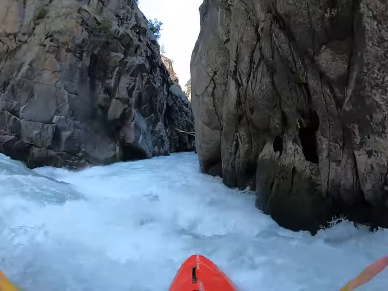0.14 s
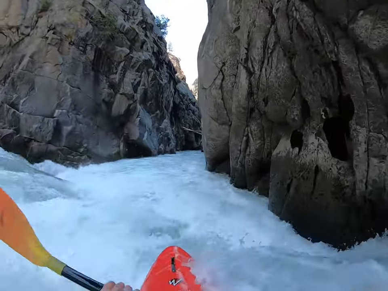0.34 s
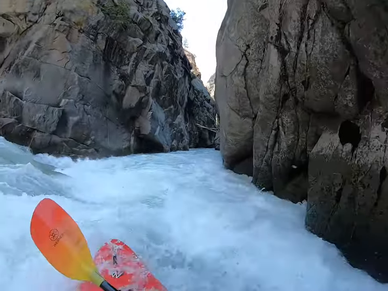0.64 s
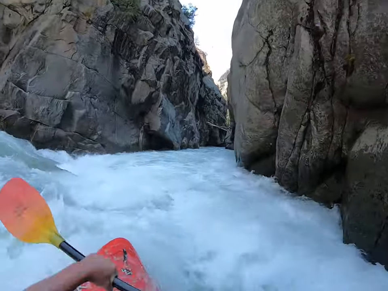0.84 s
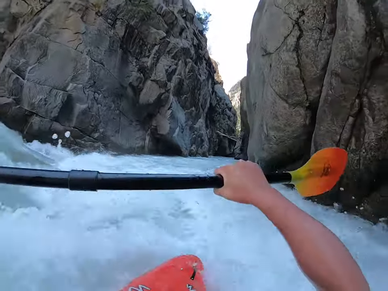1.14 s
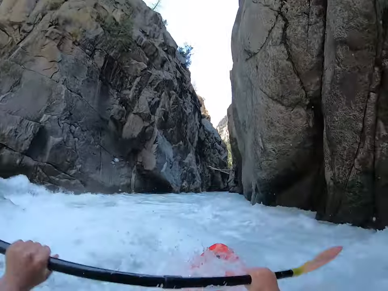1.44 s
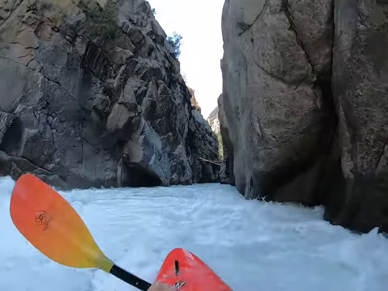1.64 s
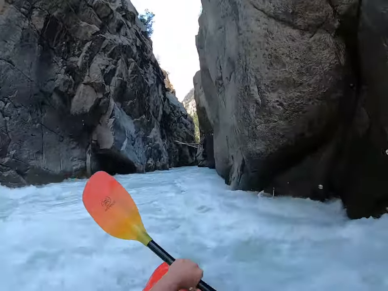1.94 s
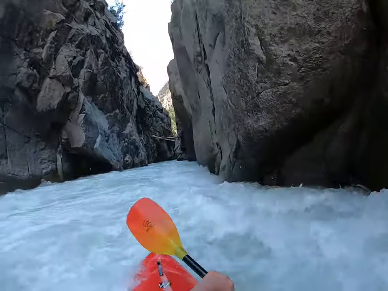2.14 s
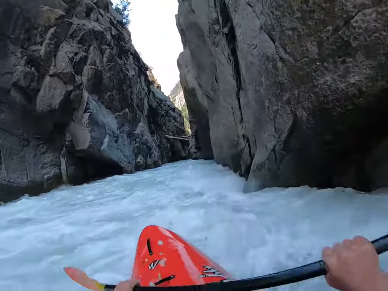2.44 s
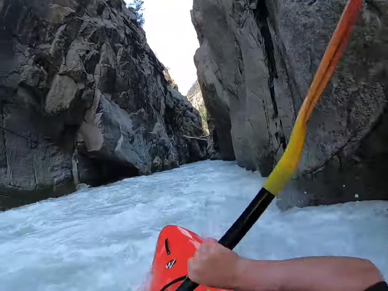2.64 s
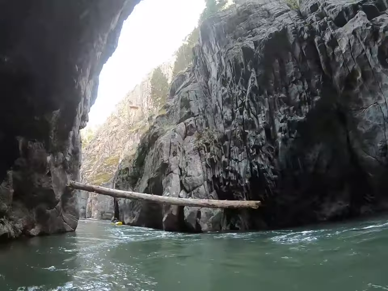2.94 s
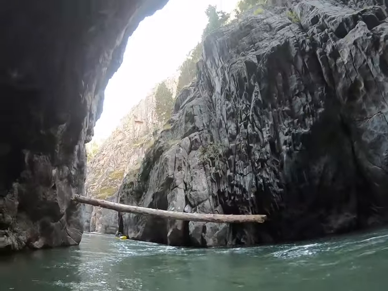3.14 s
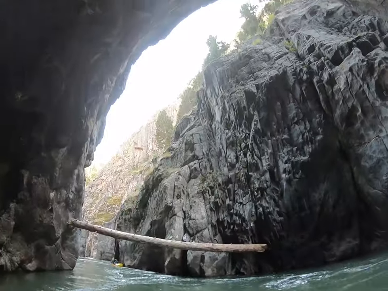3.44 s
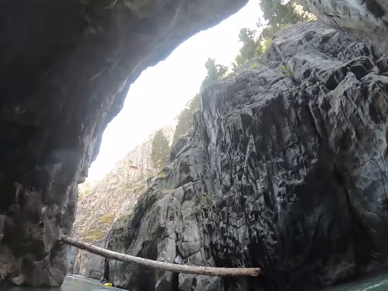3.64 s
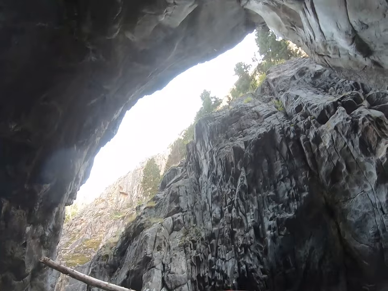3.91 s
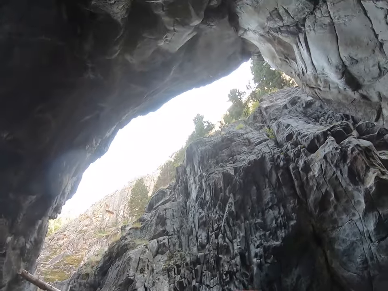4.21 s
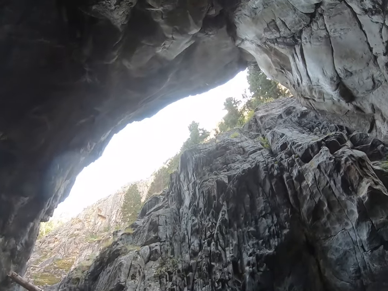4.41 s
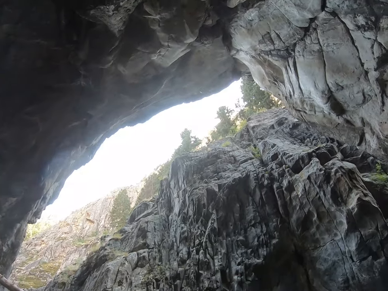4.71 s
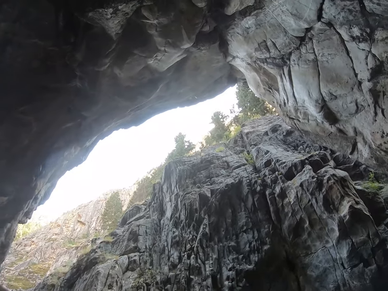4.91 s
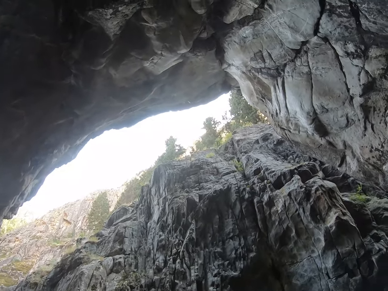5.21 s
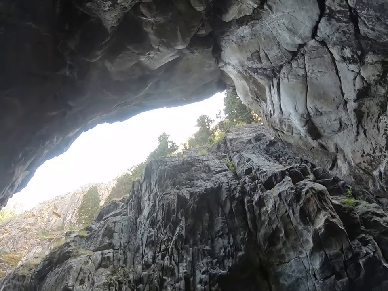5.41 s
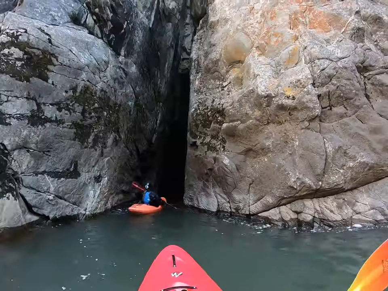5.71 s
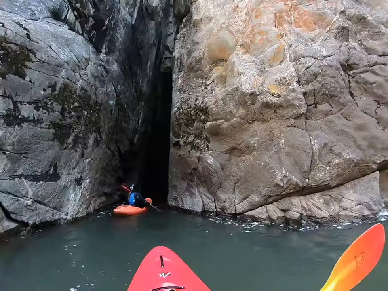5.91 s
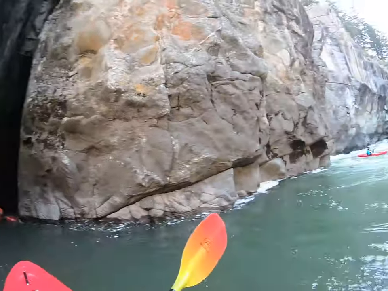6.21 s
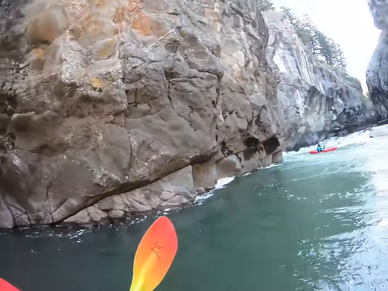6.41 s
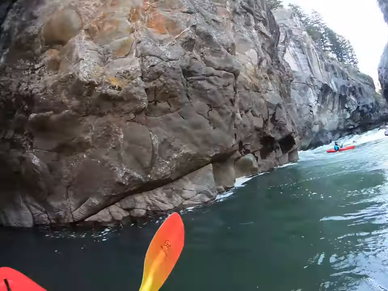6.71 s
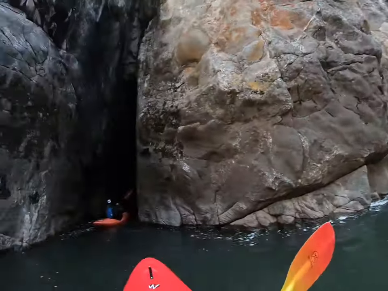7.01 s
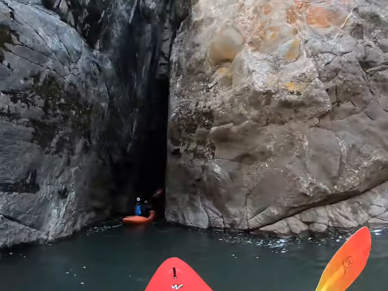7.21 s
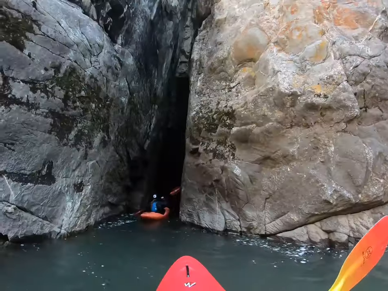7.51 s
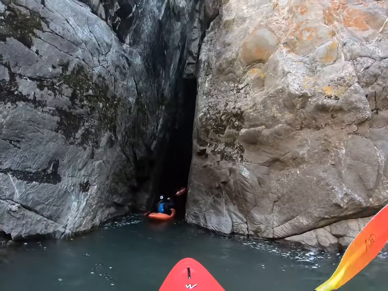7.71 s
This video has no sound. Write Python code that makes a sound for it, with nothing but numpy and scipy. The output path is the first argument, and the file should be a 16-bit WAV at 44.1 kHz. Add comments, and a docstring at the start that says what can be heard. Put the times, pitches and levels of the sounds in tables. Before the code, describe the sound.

Heard from a kayaker's wet microphone: a loud, muffled rapid churns and plunges with gurgling lumps and one tiny thud, a thin hiss on the right. It cuts abruptly to much quieter distant rapids under a rock overhang, with low wind puffs, hull glugs and a couple of drips. Another cut brings an open pool, river wash leaning right and ripples lapping.

```python
"""A kayak run through a rock canyon in three moments, heard at the paddler through a wet microphone.
First the rapid: a muffled roar of noise eddies and ringing bubbles, lumpy with brief gliding tones
and one very short thud, under a thin hiss on the right.
Then far rapids under an overhang: blurred bubbles and foam, puffs of low noise for wind, a few drips.
Last an open pool: white water and its hiss lean to the right, in a light breeze.
Under the overhang and on the pool, short wobbling tones make ripples lap at the hull."""
import sys
import numpy as np
from scipy import signal
from scipy.fft import rfft, irfft, next_fast_len
from scipy.io import wavfile
from scipy.ndimage import map_coordinates

SR = 44100
rng = np.random.default_rng(int(sys.argv[2]) if len(sys.argv) > 2 else 0)


def master_out(mix):
    """Clip the mix to full scale and print it as 16-bit PCM to the path in sys.argv[1]."""
    frames = np.transpose(np.atleast_2d(mix))
    ceiling = np.clip(frames, -1, 1)
    pcm = np.round(ceiling * 32767).astype(np.int16)
    wavfile.write(sys.argv[1], SR, pcm)


N = 346343

LEAVE_RAPID_S, ENTER_POOL_S = 2.8793, 5.781
JOIN_S = .0002   # fade at each end of a place
WIDENS_AT_S, WIDENS_OVER_S = 3.4, 1   # the overhang's river and wind open out from mono
FIZZ_DB = -88.5   # foam under the overhang, halfway through its stay
DRAUGHT_DB, BREEZE_DB = -50, -61   # steady air between puffs: overhang, pool
POOL_DB = -40.5   # far rapids across the pool
WIND_BELOW_HZ, FOAM_ABOVE_HZ = 1000, 7000
FULL_VIGOUR_DB = -20   # the vigour curve counts as 1 here
DRIP_DULL_HZ, CUTOFF_HZ = 12500, 15750

# Spectra of the sources; only the shape counts. Each row: frequency in Hz, relative density in dB per Hz.
OVERHANG_COLOUR = [(50, -25), (100, -10.5), (150, -1.5), (230, -2.5), (340, -7.5), (550, -9.5), (1000, -17),
                   (1600, -21), (3100, -27), (4300, -35), (6000, -46), (7200, -59), (8400, -76),
                   (14000, -110)]
FIZZ_COLOUR = [(4000, -4), (6000, 0), (8000, -7), (11900, -10), (12800, -30), (15000, -45)]
WIND_COLOUR = [(12, -18), (25, -5), (55, -2.5), (90, -7), (130, -7), (200, -21), (1000, -80)]
POOL_COLOUR = [(50, -16), (110, -13), (160, -0.6), (250, -2), (400, -6), (700, -8.5), (1200, -14),
               (2200, -20), (3400, -24.5), (4700, -32.5), (5800, -34.5), (8300, -47), (12200, -46.5),
               (13800, -57), (15000, -85)]
BREEZE_COLOUR = [(15, -18), (40, -11), (65, 10.5), (110, 8.5), (200, -17), (400, -42), (1000, -70)]
PORT_COLOUR = [(10000, -50.5), (11000, -23.5), (11600, -8), (12200, -3.5), (13500, -11), (15700, -19)]
SPRAY_COLOUR = [(700, 7.5), (950, -7.5), (1200, -8.5), (1320, -14), (1700, -15), (2250, -29), (2600, -25.5),
                (3100, -36), (3700, -44), (4500, -47.5), (6000, -48.5), (7200, -56.5), (10000, -64),
                (11500, -82.5)]
RAPID_COLOUR = [(25, -5.5), (60, -1), (130, -0.9), (180, -2), (250, -1), (340, -3), (500, -6.5), (650, -12),
                (850, -14.5), (1200, -20)]

# Stereo image of the sources. Each row: frequency in Hz, likeness of the ears from 0 to 1,
# left minus right in dB, phase lag of the left in radians.
OVERHANG_EARS = [(150, .96, -.6, 0), (300, .96, -.4, 0), (600, .72, -1.3, 0), (800, .55, -2.7, 0),
                 (1200, .2, -1.3, 1.1), (2000, .35, .5, -.3), (4200, .75, -.2, .1), (6500, .12, 0, 0),
                 (11000, .05, -3.7, 0)]
WIND_EARS = [(40, .35, -2.5, 0), (90, .5, -1.5, 0), (140, .85, -.6, 0)]
POOL_EARS = [(200, .98, -.2, .13), (450, .82, -2.9, .41), (700, .5, -4.8, .65), (950, .25, -5.6, -1),
             (1300, .42, -3.5, -1.3), (1900, .36, -2, -.8), (2700, .45, -3.1, .3), (4000, .56, -3.1, -.1),
             (5500, .36, -4.2, 2), (7500, .38, -.6, 3), (9500, .42, -6.1, 3.5), (12000, .11, -10, 3.5)]
BREEZE_EARS = [(60, .1, -6.8, 2), (130, .6, -3, .3)]
PORT_EARS = [(11000, 0, -25, 0), (12300, 0, -34, 0), (15500, 0, -24, 0)]
RAPID_EARS = [(100, 1, 0, 0), (10000, 1, 0, 0)]

# Far rapids fading as the kayak drifts under the overhang. Each row: time in seconds, level in dB.
OVERHANG_RIVER = [(2.92, -39.5), (3.95, -43.5), (5.75, -44)]
# Hiss of the pool's foam; it dips while the head is turned. Each row: time in seconds, level in dB.
POOL_FOAM = [(5.85, -70.5), (6.2, -72.5), (6.75, -74.5), (7.35, -71)]
# Hiss of the wet right microphone port. Each row: time in seconds, level in dB.
PORT_HISS = [(0.05, -59), (0.35, -64.5), (1.53, -59), (1.68, -64.5), (1.82, -75.5), (2.0, -71),
             (2.26, -64.5), (2.51, -62.5), (2.85, -67)]
# Spray all around in the rapid. Each row: time in seconds, level in dB.
SPRAY = [(0.07, -34.5), (0.2, -37), (0.34, -36), (0.58, -36.5), (0.66, -35.5), (0.8, -34.5), (0.92, -35.5),
         (1.14, -34.5), (1.24, -36.5), (1.32, -34), (1.42, -36), (1.5, -33.5), (1.69, -36.5), (1.9, -35.5),
         (2.3, -35.5), (2.85, -36.5)]
# Froth; it swells as a wave breaks over the bow and thins behind it. Each row: time in seconds, level in dB.
FROTH = [(0.15, -27), (0.25, -28.5), (0.33, -25.5), (0.5, -28.5), (1.0, -27), (1.25, -27.5), (1.32, -25),
         (1.41, -25), (1.48, -22.5), (1.58, -26.5), (1.63, -24), (1.68, -31), (1.87, -33.5), (1.97, -29.5),
         (2.1, -30.5), (2.19, -28), (2.6, -28), (2.76, -31.5)]
# Vigour of the water round the bow; it slackens after the drop and builds again.
# Each row: time in seconds, vigour in dB (steers churn and plunge by powers, not a level itself).
VIGOUR = [(0.03, -20.5), (1.17, -20.5), (1.23, -23.5), (1.48, -21), (1.61, -20.5), (1.68, -25.5),
          (1.85, -26.5), (2.05, -25.5), (2.22, -23.5), (2.56, -22.5), (2.76, -27), (2.86, -25.5)]

# Puffs of wind on the microphone. Each row: peak in seconds, level in dB, length at half power in seconds.
PUFFS = [(3.16, -41.5, .08), (3.26, -42, 0.13), (3.68, -42, 0.17), (3.81, -36.5, 0.095), (3.97, -42, 0.059),
         (4.4, -54, 0.2), (5.82, -51, 0.055), (6.28, -40.5, .06), (6.36, -44, 0.043), (6.53, -50.5, .12),
         (7.1, -57, 0.14), (7.44, -43, 0.05)]
# The bow plunges into a wave. Each row: peak in seconds, level in dB, length at half power in seconds.
PLUNGES = [(0.1, -30, 0.054), (0.22, -23.5, 0.1), (0.33, -26, .1), (0.52, -29.5, 0.11), (0.69, -27.5, .12),
           (1.06, -27, 0.051), (1.41, -27, 0.096), (1.615, -24, .11), (2.59, -28, 0.073), (2.7, -28.5, .07)]
# Drips off the rock. Each row: landing in seconds, bubble level in dB, bubble pitch in Hz,
# bubble length in seconds, splash level in dB, splash decay by 60 dB in seconds.
DRIPS = [(4.9717, -64, 6000, .0006, -56.5, .009), (5.6413, -51.5, 2750, .0025, -68.5, .06)]
# Ripples lap and glug at the hull on calmer water.
# Each row: peak in seconds, level in dB, pitch at the peak in Hz, length at half power in seconds.
LAPS = [(3.245, -42, 105.7, 0.068), (3.43, -44, 145, .05), (3.634, -44.5, 193, .04),
        (3.695, -45, 151.7, 0.05), (3.8, -50, 103.6, 0.083), (3.86, -41, 156, 0.034),
        (3.982, -45, 138.4, 0.041), (5.83, -46, 193.6, .04), (5.907, -45, 311, 0.04),
        (6.098, -45, 132.6, 0.048), (6.252, -44, 149.6, 0.04), (6.275, -43.5, 247.6, 0.031),
        (6.435, -45, 218, 0.047), (6.497, -42.5, 170, 0.041), (6.752, -41.5, 220.6, .035),
        (6.87, -46, 285, .04), (6.98, -47, 231, .07), (7.19, -48, 228, .05), (7.364, -43, 237, .04),
        (7.447, -41.5, 151, 0.032), (7.457, -46.5, 256, 0.028), (7.645, -46, 235, 0.036),
        (7.724, -43, 170, 0.033)]
# One very short thud of about one cycle within the roar.
# Each row: peak in seconds, level in dB, pitch in Hz, length at half power in seconds.
THUD = [(1.2503, -12.5, 420, .002)]
# Brief gliding tones, 130 to 530 Hz, that make the roar lumpy.
# Each row: peak in seconds, level in dB, pitch at the peak in Hz, length at half power in seconds.
ROAR_LUMPS = [(0.04, -22.5, 173, .05), (0.067, -22.5, 229.6, .04), (0.102, -27, 366.6, .03),
              (0.267, -25, 156.8, .05), (0.38, -24, 136.5, .08), (0.464, -22.5, 160, .05),
              (0.578, -23, 198.2, .06), (0.702, -23.5, 216.2, .05), (0.795, -20, 174.8, .06),
              (0.903, -25, 257, .04), (0.97, -24.5, 322, .06), (1.065, -24.5, 231, .05),
              (1.175, -27, 173.4, .025), (1.318, -26.5, 526, .03), (1.465, -22, 270, .04),
              (1.483, -27, 303, .03), (1.492, -24, 191.8, .04), (1.59, -25, 128.7, .06),
              (1.628, -27, 462.3, .03), (2.102, -24.5, 268, .03), (2.107, -23.5, 393.4, .03),
              (2.226, -25, 278.6, .035), (2.29, -30, 245.3, .035), (2.354, -22.5, 258, .035),
              (2.49, -27.5, 252, .04), (2.534, -30, 396.4, .03), (2.563, -26, 235.5, .04)]


def from_db(db):
    """Decibels to gain."""
    return 10 ** (np.asarray(db) / 20)


def rms_one(x):
    """Scale to unit power."""
    return x / np.sqrt(np.mean(x ** 2) + 1e-30)


def level_at(rows, t):
    """A level curve in dB, read as gain at times t."""
    s, db = np.transpose(rows)
    return from_db(np.interp(t, s, db))


def at_hz(rows, hz):
    """The columns of a table read on a log-frequency axis."""
    points, *columns = np.transpose(rows)
    return [np.interp(np.log(hz + 1), np.log(points), c) for c in columns]


def drift(t, rate):
    """Smooth random wander of rms 1, turning about rate times a second."""
    knots = rng.standard_normal(4096)
    return rms_one(map_coordinates(knots, [t * rate], order=3, mode="wrap"))


def swells(rows, t, steady):
    """Bell-shaped swells whose power adds to that of a steady gain."""
    power = 0
    for peak, db, length in rows:
        power = power + from_db(db) ** 2 * .5 ** ((2 * (t - peak) / length) ** 2)
    return np.sqrt(steady ** 2 + power)


def ring(clicks, hz, t60):
    """A damped resonance: each unit click sets off a decaying sine of height 1."""
    radius = from_db(-60 / (t60 * SR))
    angle = 2 * np.pi * hz / SR
    return signal.lfilter([0, np.sin(angle)], [1, -2 * radius * np.cos(angle), radius ** 2], clicks + 1e-18)


def bubbles(t, per_s, cycles, size_db, clump_db, count=36):
    """Clouds of bubbles of all sizes, each ringing a few cycles; equal power per Hz overall."""
    out, surge = np.zeros(len(t)), drift(t, 9)
    pitches = np.geomspace(120, 14000, count)
    for hz in pitches:
        share = np.sqrt(hz) / np.sqrt(pitches).sum()   # small bubbles are more common
        chance = per_s * share * from_db(clump_db * surge) / SR
        born = np.flatnonzero(rng.random(len(t)) < chance)
        strength = from_db(size_db * np.minimum(rng.exponential(1, len(born)), 4))
        clicks = np.zeros(len(t))
        clicks[born] = strength * rng.choice([-1, 1], len(born))
        ringing = np.diff(ring(clicks, hz, cycles / hz), prepend=0)
        out += np.sqrt(hz) * rms_one(ringing)
    return rms_one(out)


def white_water(t, per_s, cycles, size_db, clump_db, foam_db):
    """Two unrelated streams of ringing bubbles in a noise bed of tumbling foam."""
    streams = np.array([bubbles(t, per_s, cycles, size_db, clump_db) for _ in range(2)])
    return streams + from_db(foam_db) * rng.standard_normal((2, len(t)))


def eddies(t, lump_db):
    """Turbulence: two noise streams that swell together in lumps."""
    return rng.standard_normal((2, len(t))) * from_db(lump_db * drift(t, 15))


def heard(source, colour, ears, low_hz=10, high_hz=20000):
    """Colour a two-stream source and spread it between the ears; the middle has rms 1."""
    n = source.shape[1]
    size = next_fast_len(n + 4096)
    hz = np.arange(size // 2 + 1) * SR / size + 1e-3
    a, b = rfft(source, size)
    alike, balance_db, lag = at_hz(ears, hz)
    alike = np.clip(alike, 0, 1)
    own = np.sqrt(1 - alike ** 2)
    left = from_db(balance_db) * np.exp(-1j * lag)
    middle = np.hypot(np.abs(left + alike), own)
    register = 1 / ((1 + (low_hz / hz) ** 12) * (1 + (hz / high_hz) ** 12))
    gain = from_db(at_hz(colour, hz)[0]) * register / middle
    both = np.array([left * a, alike * a + own * b])
    out = irfft(both * gain, size)[:, :n]
    return out / np.sqrt(np.mean(out.mean(axis=0) ** 2))


def gliding_tones(rows, t, rise_octaves_per_s, wobble, wobbles_per_s=70.0):
    """Sine tones that swell and fade while the pitch climbs and wobbles at random (wobble in octaves)."""
    out = np.zeros(len(t))
    for peak, db, hz, length in rows:
        near = np.abs(t - peak) < 3 * length
        octaves = rise_octaves_per_s * (t[near] - peak) + wobble * drift(t[near], wobbles_per_s)
        turns = np.cumsum(hz * 2 ** octaves) / SR + rng.random()
        tone = np.sqrt(2) * np.sin(2 * np.pi * turns)   # rms 1
        out[near] += swells([(peak, db, length)], t[near], 0) * tone
    return out


def opening_out(sound, t):
    """The difference between the ears grows from nothing to its full size."""
    middle = sound.mean(axis=0)
    width = np.clip((t - WIDENS_AT_S) / WIDENS_OVER_S, 0, 1)
    return middle + width * (sound - middle)


def wind(t, steady_db, lump_db, colour, ears):
    """Air buffets the microphone: low lumpy turbulence, a steady flow with puffs on top."""
    air = heard(eddies(t, lump_db), colour, ears, high_hz=WIND_BELOW_HZ)
    return swells(PUFFS, t, from_db(steady_db)) * air


def foam_fizz(water, t, rise_db_per_s=4.0):
    """The treble of bursting foam, growing as the foam drifts nearer."""
    fizz = heard(water[::-1], FIZZ_COLOUR, OVERHANG_EARS, 4000)   # streams swapped
    return fizz * from_db(FIZZ_DB + rise_db_per_s * (t - t.mean()))


def overhang(t):
    """Far rapids blurred by the rock vault with long-ringing bubbles, foam fizz and puffs of wind."""
    water = white_water(t, per_s=18000, cycles=10.5, size_db=4.0, clump_db=.5, foam_db=5.0)
    river = level_at(OVERHANG_RIVER, t) * heard(water, OVERHANG_COLOUR, OVERHANG_EARS)
    puffing = wind(t, DRAUGHT_DB, 1.5, WIND_COLOUR, WIND_EARS)
    return opening_out(river + puffing, t) + foam_fizz(water, t)


def pool(t):
    """White water across the open pool, its treble set apart as foam hiss, and a light breeze."""
    water = white_water(t, per_s=15000, cycles=8.8, size_db=1.2, clump_db=.5, foam_db=3.5)
    river = from_db(POOL_DB) * heard(water, POOL_COLOUR, POOL_EARS, high_hz=FOAM_ABOVE_HZ)
    foam = level_at(POOL_FOAM, t) * heard(water, POOL_COLOUR, POOL_EARS, low_hz=FOAM_ABOVE_HZ)
    return river + foam + wind(t, BREEZE_DB, 2.5, BREEZE_COLOUR, BREEZE_EARS)


def drips(t, echo_db=-16.0, echo_t60=0.19):
    """A drop lands with a bright splash and a short ringing bubble; the rock vault answers with a faint tail."""
    bright = signal.butter(2, [1800, 13000], "band", fs=SR, output="sos")
    splash, echo, plinks = np.zeros(N), np.zeros(N), []
    for s, bubble_db, hz, length, splash_db, splash_t60 in DRIPS:
        age = np.clip(t - s, 0, 1)
        splash += (t >= s) * from_db(splash_db - 60 * age / splash_t60)
        echo += (t >= s) * from_db(splash_db + echo_db - 60 * age / echo_t60)
        plinks.append((s + length / 2, bubble_db, hz, length))
    near, left, right = rms_one(signal.sosfilt(bright, rng.standard_normal((3, N))))
    out = splash * near + echo * np.array([left, right])
    out = out + gliding_tones(plinks, t, rise_octaves_per_s=13, wobble=0.041)
    return signal.sosfilt(signal.butter(8, DRIP_DULL_HZ, fs=SR, output="sos"), out + 1e-18)


def laps(t):
    """Ripples trap small pockets of air against the hull, which glug as they rise."""
    return gliding_tones(LAPS, t, rise_octaves_per_s=1.194, wobble=0.096)


def port_hiss(t):
    """The wet right microphone port hisses: thin, very high noise."""
    hiss = heard(rng.standard_normal((2, len(t))), PORT_COLOUR, PORT_EARS, 10000)
    return level_at(PORT_HISS, t) * hiss


def plunging(t, vigour, steady_db=-28.0, follows=0.65):
    """Plunging water: deep turbulence that surges as the bow goes into each wave."""
    deep = heard(eddies(t, lump_db=1.2), RAPID_COLOUR, RAPID_EARS, 24, 150)
    return swells(PLUNGES, t, from_db(steady_db) * vigour ** follows) * deep


def churning(t, vigour, churn_db=-21.0, follows=1.32, surge_db=0.64, surges_per_s=14.0):
    """One bubble stream in three registers: big bubbles churn, small ones froth, fine ones spray."""
    water = white_water(t, per_s=14000, cycles=5.6, size_db=2.0, clump_db=1.0, foam_db=4.0)
    churn = from_db(churn_db + surge_db * drift(t, surges_per_s)) * vigour ** follows
    big = churn * heard(water, RAPID_COLOUR, RAPID_EARS, 130, 420)
    small = level_at(FROTH, t) * heard(water, RAPID_COLOUR, RAPID_EARS, 420, 900)
    fine = level_at(SPRAY, t) * heard(water, SPRAY_COLOUR, RAPID_EARS, 900, 11000)
    return big + small + fine


def rapid(t):
    """Water plunges and churns in a lumpy roar; a film of water on the microphone gives the dull colour."""
    vigour = level_at(VIGOUR, t) / from_db(FULL_VIGOUR_DB)
    lumps = gliding_tones(ROAR_LUMPS, t, rise_octaves_per_s=1.48, wobble=0.099)
    thud = gliding_tones(THUD, t, rise_octaves_per_s=0, wobble=0)   # level pitch
    return port_hiss(t) + plunging(t, vigour) + churning(t, vigour) + lumps + thud


def faded(place, t):
    """The sound of one place; it starts and stops abruptly."""
    to_edge = np.minimum(t - t[0], t[-1] - t)
    return place(t) * np.sin(np.pi / 2 * np.clip(to_edge / JOIN_S, 0, 1))


def scene():
    """The three places follow each other without a pause, with drips and laps laid over them."""
    t = np.arange(N) / SR
    first, second, third = np.split(t, [round(LEAVE_RAPID_S * SR), round(ENTER_POOL_S * SR)])
    river = np.hstack([faded(rapid, first), faded(overhang, second), faded(pool, third)])
    return river + drips(t) + laps(t)


def record(dry):
    """A steep low-pass cuts the top."""
    return signal.sosfilt(signal.ellip(10, .1, 80, CUTOFF_HZ, fs=SR, output="sos"), dry)


dry = scene()
out = record(dry)
master_out(out)
```